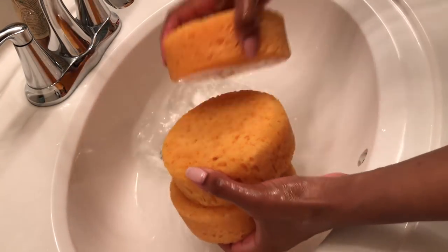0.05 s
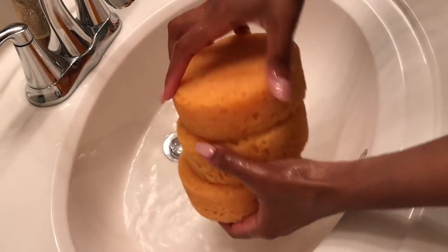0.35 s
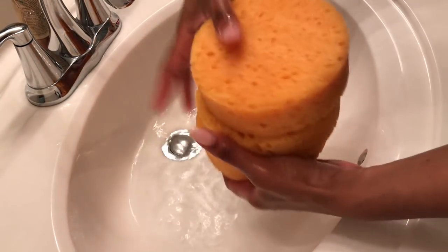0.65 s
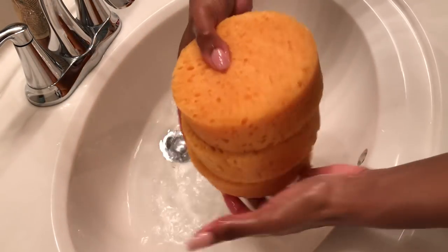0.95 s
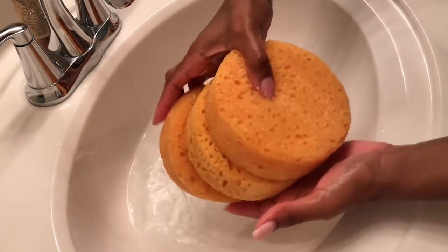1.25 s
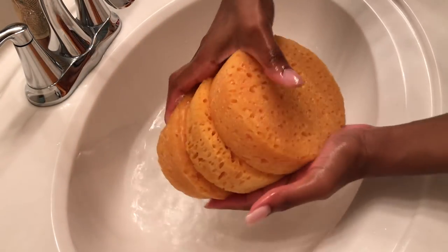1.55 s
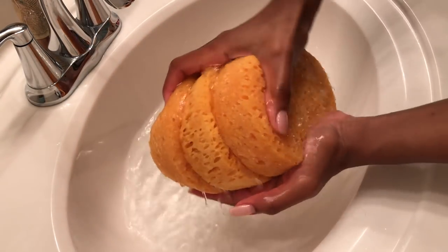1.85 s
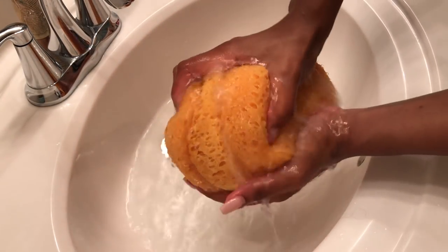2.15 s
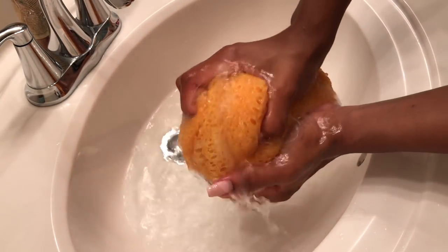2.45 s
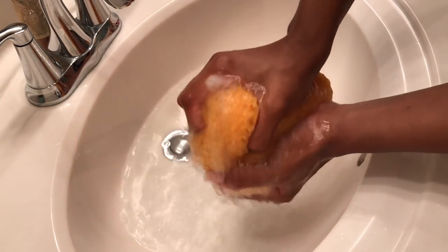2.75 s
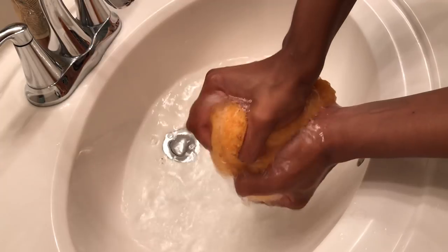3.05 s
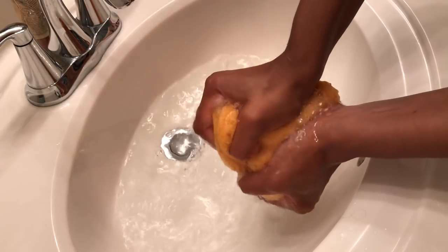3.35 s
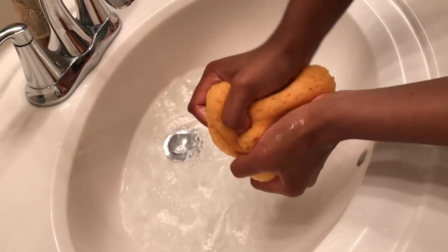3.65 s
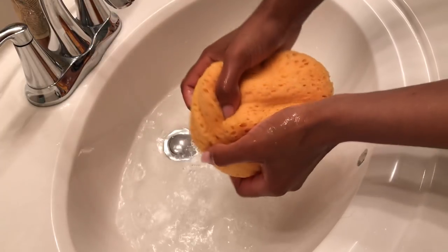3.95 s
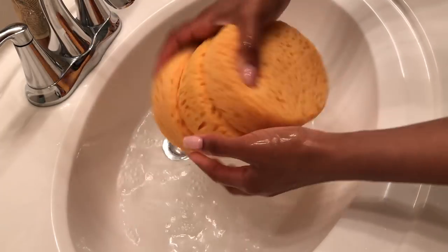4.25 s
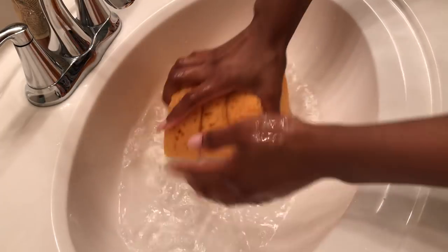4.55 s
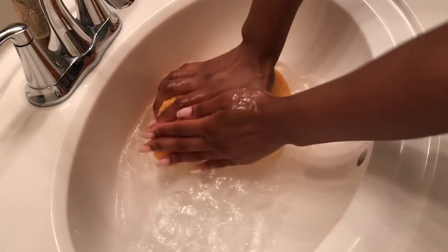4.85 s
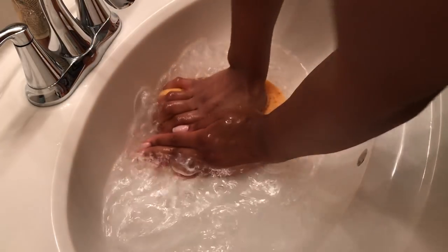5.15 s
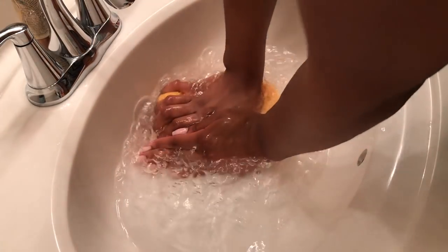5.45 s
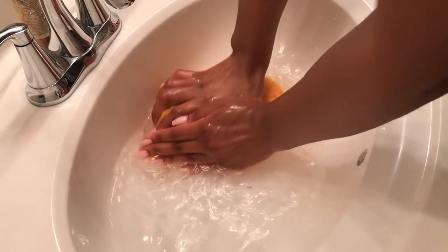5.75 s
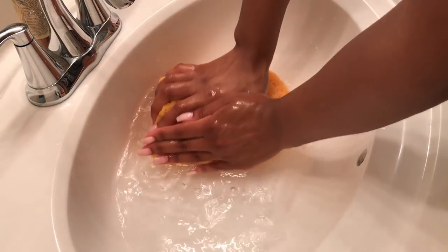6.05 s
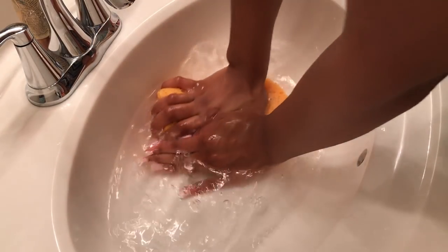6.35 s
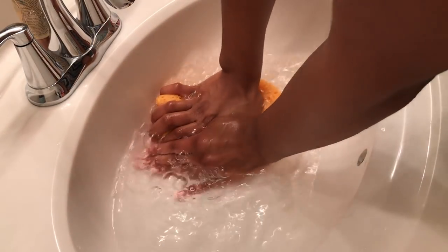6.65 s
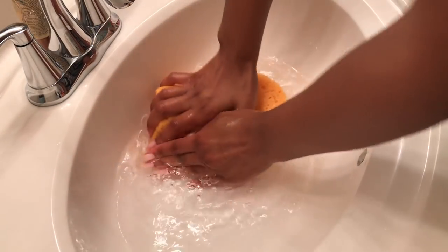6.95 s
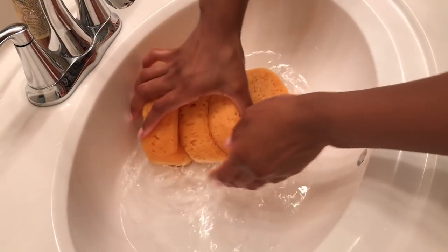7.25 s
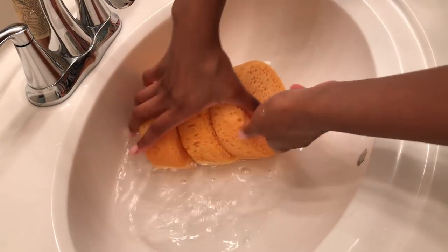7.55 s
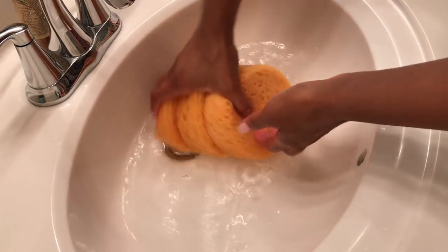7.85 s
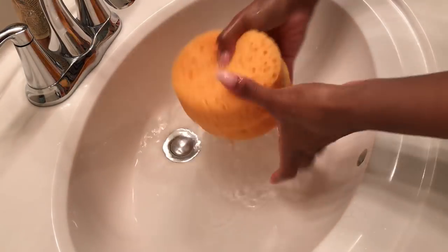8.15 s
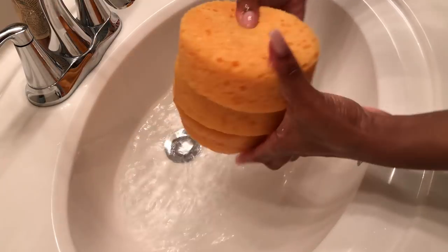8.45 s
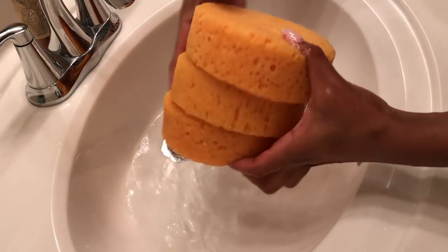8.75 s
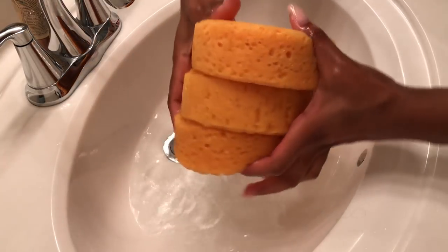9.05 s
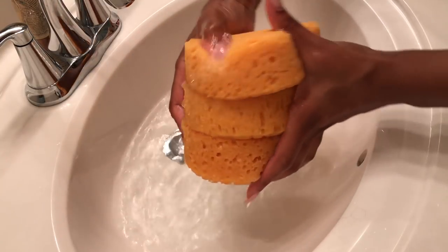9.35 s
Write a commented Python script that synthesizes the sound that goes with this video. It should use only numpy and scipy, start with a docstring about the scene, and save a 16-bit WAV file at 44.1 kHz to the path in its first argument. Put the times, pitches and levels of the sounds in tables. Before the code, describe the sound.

Soaked sponges fizz and drip, gush into a basin as they are squeezed, then churn and gurgle when pressed under shallow water.

```python
"""Soaked sponges are wrung out over a ceramic sink in a small, humming bathroom.
First the gripped foam fizzes, drips plink as they trap air bubbles, and a wet sponge lands with a thud.
From about 2 s the wringing lets go a spattering pour; after 3.4 s it thins and the foam sucks in air.
From 5.2 s the sponges are pressed twice under shallow water, which glugs, churns, froths and squirts.
Last come more fizz and scattered drips. Bowl and walls echo every sound of the water."""
import sys
import numpy as np
from scipy import signal
from scipy.fft import rfft, irfft
from scipy.io import wavfile
from scipy.ndimage import uniform_filter1d

SR = 44100
rng = np.random.default_rng(int(sys.argv[2]) if len(sys.argv) > 2 else 0)


def to_wav(sig):
    """Store sig (one row per channel, or 1-D mono) as 16-bit WAV at the path in sys.argv[1].

    Samples outside -1..1 are clipped; the rate is SR.
    """
    pcm = np.clip(np.atleast_2d(sig), -1, 1) * 32767
    pcm = np.round(pcm).astype(np.int16)
    wavfile.write(sys.argv[1], SR, pcm.T)  # frames by channels


N = 414532
TIME = np.arange(N) / SR


def amp(db):
    """Amplitude ratio of a level in decibels."""
    return 10 ** (np.asarray(db) / 20)


def unit_rms(x):
    """Normalisation to a mean power of 1."""
    return x / np.sqrt(np.mean(x ** 2) + 1e-20)


def read(points, hz):
    """Interpolation of (frequency_hz, value) points on a log-frequency axis."""
    f, value = np.transpose(points)
    return np.interp(np.log(hz + 1), np.log(f + 1), value)


def add(mix, start_s, sound):
    """Superposition: a sound joins the mix at start_s."""
    part = mix[max(0, round(start_s * SR)):][:len(sound)]
    part += sound[:len(part)]


def coloured(x, spectrum, size=4096):
    """Minimum-phase filtering: being causal, it leaves clicks their sharp front."""
    gain_db = np.maximum(read(spectrum, abs(np.fft.fftfreq(size, 1 / SR))), -100)
    log_response = np.conj(signal.hilbert(np.log(amp(gain_db))))
    taps = np.fft.ifft(np.exp(log_response)).real
    return signal.oaconvolve(x, taps[:size // 2])[:len(x)]


def band_noise(count, hz, width_hz):
    """Random excitation of one resonance, at rms 1."""
    f = np.fft.rfftfreq(count, 1 / SR)
    resonance = f / (f + 100) / (1 + (2 * (f - hz) / width_hz) ** 2)
    return unit_rms(irfft(rfft(rng.standard_normal(count)) * resonance, count))


def steadied(x, size=5000):
    """Division by the running rms: the level holds steady and the grain remains."""
    power = uniform_filter1d(uniform_filter1d(x ** 2, size), size // 2)
    return x / np.sqrt(abs(power) + 1e-20)


def texture(x, spectrum):
    """Source and filter: a grainy excitation takes on a spectrum, near rms 1."""
    return steadied(coloured(x, spectrum))


def clicks(per_s, spread_db):
    """A Poisson process of impacts: many small, a few large."""
    size_db = spread_db * np.minimum(rng.exponential(1, N), 5)
    return (rng.random(N) < per_s / SR) * amp(size_db) * rng.choice([-1, 1], N)


def bubble(hz, decay_s, rise_per_s=0, onset_cycles=0.73):
    """Minnaert resonance: trapped air rings as a damped spring, rising in pitch near the surface."""
    t = np.arange(0, 6 * decay_s, 1 / SR)
    turns = hz * (t + rise_per_s * t ** 2 / 2)
    onset = 1 - np.exp(-t * hz / onset_cycles)
    return np.sin(2 * np.pi * turns) * np.exp(-t / decay_s) * onset


def swarm(start_s, end_s, per_s, low_hz, high_hz, cycles, spread_db, climb=0.07, octaves_per_s=0):
    """A cloud of independent bubble resonators, random in time, size, strength and damping."""
    out = np.zeros(N)
    for when, size, strength, damping in rng.random((int(per_s * (end_s - start_s)), 4)):
        age_s = when * (end_s - start_s)
        hz = low_hz * (high_hz / low_hz) ** size * 2 ** (octaves_per_s * age_s)
        decay_s = cycles * (.5 + damping) / hz
        level_db = -spread_db * np.log(max(strength, .02))
        # small bubbles ring briefly, so they need a higher peak for the same strength
        add(out, start_s + age_s, amp(level_db) * hz / high_hz * bubble(hz, decay_s, climb / decay_s))
    return out + 1e-4 * rng.standard_normal(N)


def wobble(count, depth_db, hz=170):
    """Amplitude modulation of a bubble jostled by the water around it."""
    return amp(depth_db * band_noise(8192, hz, 2 * hz)[:count])


def stroke(start_s, end_s, rise_db_per_s, fall_db_per_s):
    """Envelope of a hand movement: exponential growth to 1 at start_s, exponential decay from end_s."""
    before_s = np.maximum(start_s - TIME, 0)
    after_s = np.maximum(TIME - end_s, 0)
    return amp(-rise_db_per_s * before_s - fall_db_per_s * after_s)


def power_sum(gains):
    """Incoherent addition: the powers of overlapping sources add."""
    return np.sqrt(sum(gain ** 2 for gain in gains))


# ventilation rumble: frequency_hz, gain_db
RUMBLE_SPECTRUM = [(15, -54), (25, -45), (42, -6), (59, -22), (134, 6.5), (185, -9), (240, -3.5),
                   (282, -7.5), (421, -9), (475, -19.5), (580, -10.5), (642, -15.5), (1270, -19),
                   (1400, -22), (3000, -20), (3900, -23), (6600, -120)]
# partials of the hum: pitch_hz, level_db
HUM_PARTIALS = [(60, -70.5), (71.5, -63), (143.5, -68.5), (213, -73), (240.5, -65.5), (433, -79)]


def room_tone(rumble_db=-58.5, waver=0.29):
    """Ventilation noise under a hum whose partials waver by beating with narrow-band noise."""
    rumble = amp(rumble_db) * unit_rms(coloured(rng.standard_normal(N), RUMBLE_SPECTRUM))
    hum = sum(amp(db) * unit_rms(np.sin(2 * np.pi * hz * TIME) + waver * band_noise(N, hz, 4.4))
              for hz, db in HUM_PARTIALS)
    return rumble + hum


# bursting films: frequency_hz, gain_db
FIZZ_SPECTRUM = [(500, -5), (1500, -22), (3500, 1.5), (6200, 4.5), (9000, 3), (13000, 4.5), (17500, 1.5)]
# grips that shift or release the foam: start_s, end_s, fizz_db, dribble_db
HAND_GRIPS = [(0, 0.866, -62, -60), (1.182, 1.338, -61, -52), (1.658, 1.8, -60.5, -60),
              (1.935, 3.3, -54.5, -48), (4.54, 4.792, -62, -84), (5.63, 5.725, -64, -60),
              (6.9, 7.605, -65, -77), (8.458, 8.997, -60.5, -65), (9.403, 9.402, -52, -47.5)]
GRIP_RISE_DB_PER_S = 94


def foam(resting_db=-63.5, hardest_push_db=-55.5, follow=0.54):
    """Film rupture: tiny bursts merge into a hiss, larger ones pop; grips and pushes raise the level."""
    hiss = texture(clicks(per_s=11000, spread_db=3), FIZZ_SPECTRUM)
    films = swarm(0, N / SR, per_s=260, low_hz=5500, high_hz=16900, cycles=3, spread_db=3.8)
    pops = unit_rms(coloured(films, FIZZ_SPECTRUM))
    gains = [amp(resting_db)]
    for start_s, end_s, fizz_db, _ in HAND_GRIPS:
        gains.append(amp(fizz_db) * stroke(start_s, end_s, GRIP_RISE_DB_PER_S, fall_db_per_s=33))
    loudest_churn_db = max(churn_db for _, _, churn_db, _, _ in HAND_PUSHES)
    for start_s, end_s, churn_db, _, _ in HAND_PUSHES:
        fizz_db = hardest_push_db + follow * (churn_db - loudest_churn_db)
        gains.append(amp(fizz_db) * stroke(start_s, end_s, *SPRAY_SLOPES_DB_PER_S))
    return power_sum(gains) * (hiss + amp(-4) * pops)


# water falling into the basin: frequency_hz, gain_db
FALLING_WATER_SPECTRUM = [(300, -42.5), (600, -8), (950, -4), (1600, -4.5), (1950, -7), (3000, -2.5),
                          (4100, -4), (6000, -11), (8000, -12.5), (12000, -14.5), (15000, -14),
                          (17500, -22)]


def dribble(trim_db=-2):
    """Air entrainment: each grip frees thin trickles that leave a scatter of small ringing bubbles."""
    bubbles = swarm(0, N / SR, per_s=260, low_hz=1093, high_hz=8340, cycles=5.6, spread_db=2.5,
                    climb=0.069)
    level = power_sum(amp(db) * stroke(start_s, end_s, GRIP_RISE_DB_PER_S, fall_db_per_s=50)
                      for start_s, end_s, _, db in HAND_GRIPS)
    return amp(trim_db) * level * texture(bubbles, FALLING_WATER_SPECTRUM)


# drip plinks, and glugs from the pressed sponges:
# start_s, pitch_hz, level_db, decay_ms, relative_rise_per_s, click_db
RINGING_BUBBLES = [(.015, 1595, -22.5, 4.5, -11, -42.5), (0.014, 2720, -34, 1.7, 0, -52),
                   (.089, 1080, -37, 6.8, 1, -62), (.135, 5900, -31, 1.6, 0, -43),
                   (0.177, 6150, -27, 1.7, 8, -53), (.186, 1387, -24, 7.2, 8.5, -36),
                   (.235, 1310, -26.5, 5.7, 32, -51), (.289, 1308, -22, 4.5, -1, -34.5),
                   (0.334, 2250, -37.5, 6.7, 6, -39), (.448, 4700, -29, 2.2, 11, -23.5),
                   (.48, 1915, -36.5, 5.1, 4, -44), (0.639, 3200, -33.5, 1.9, 29, -36),
                   (.733, 1800, -22, 2.7, -12, -30.5), (.788, 4320, -27, 2.1, 2, -38),
                   (.802, 2310, -35.5, 3, 0, -38), (.829, 4960, -34, 2.4, 0, -37.5),
                   (0.897, 4600, -28.5, 2.5, 0, -33), (1.192, 857, -21, 9.2, 0, -36),
                   (1.202, 1694, -27.5, 8.1, -1.5, -35), (1.222, 1220, -23, 4.1, 5, -28.5),
                   (1.252, 5800, -28.5, 1.4, 30, -47), (1.297, 1734, -27, 8, 0, -30.5),
                   (1.391, 2190, -39.5, 5, 5, -53), (1.436, 1690, -30, 4.9, -4.5, -39.5),
                   (1.650, 2390, -37.5, 4.4, 3, -46), (1.661, 2360, -31.5, 2.3, 8, -37),
                   (1.792, 4100, -28.5, 1.6, -9, -39.5), (1.899, 1910, -37, 4.4, 28, -29.5),
                   (2.059, 5080, -23.5, 1.2, 14, -33), (2.086, 1920, -34, 3, -2, -46),
                   (2.113, 1264, -23.5, 4.9, -4.5, -35), (2.155, 1707, -24.5, 3.5, -0.5, -35),
                   (2.267, 904, -22, 7.2, 14, -30), (2.344, 1005, -28, 6.6, 3, -37),
                   (2.377, 1025, -25.5, 5.7, 3, -36), (2.414, 880, -24.5, 8.3, 9.5, -30),
                   (2.455, 678, -31.5, 8, 9, -41), (2.491, 1020, -27.5, 7.3, 2, -38),
                   (2.596, 4090, -16, 1.6, 4, -41), (2.597, 1134, -26, 5.5, 4, -35),
                   (2.626, 950, -25.5, 8.3, 5, -41), (2.672, 2350, -23.5, 3.3, 4, -28),
                   (2.686, 1800, -27, 3.5, -3, -28), (2.809, 1690, -23.5, 4.3, 0, -30),
                   (2.810, 630, -31, 6.7, 2.5, -29), (2.924, 1280, -26, 6, 2, -33),
                   (2.948, 1125, -28, 6.3, 6, -30), (3.051, 3020, -21.5, 1.8, 0, -24),
                   (3.077, 3900, -15, 1.4, 10, -21), (3.085, 614, -28, 4.7, 3, -32),
                   (3.111, 6100, -16, 1.2, 2, -31), (3.135, 1730, -30, 4, 2, -36),
                   (3.171, 1600, -32, 4.9, 0, -40), (3.228, 3470, -24, 2, 5, -38),
                   (3.256, 1630, -23, 5.8, 5, -40), (3.381, 1270, -30, 5, -1, -40),
                   (3.395, 1650, -23.5, 4, 31, -36), (3.450, 1600, -25, 6, -1.5, -31),
                   (3.531, 1525, -28, 7, 6, -38), (3.565, 1460, -31, 4.5, 5, -34),
                   (3.625, 2950, -28.5, 2.2, -4, -34), (3.698, 2960, -31, 2.4, 0, -39),
                   (3.736, 1333, -31, 6.8, 5.5, -38), (3.759, 2580, -30.5, 3.2, -14, -43),
                   (3.785, 4450, -33, 2, 0, -44), (3.792, 2985, -31, 2.4, 2, -40),
                   (3.955, 1524, -33.5, 4.8, 12, -50), (3.954, 3480, -27.5, 1.8, 9, -50),
                   (4.006, 1650, -42, 5, 3, -55), (4.064, 4400, -40, 3, -3, -55),
                   (4.672, 3400, -30.5, 2.2, 22, -49), (5.125, 1050, -43, 9.7, -2, -53),
                   (5.25, 1355, -24.5, 3.4, 49, -55), (5.254, 600, -27, 6.4, 6, -45),
                   (5.275, 560, -26.5, 11, 0, -41), (5.314, 620, -30.5, 7.7, 6, -46),
                   (5.345, 658, -26.5, 5.2, 4, -52), (5.479, 1390, -30, 2.6, 37, -47),
                   (5.700, 2800, -42, 2.2, -2, -55), (5.727, 2150, -33.5, 3, 40, -45),
                   (6.558, 3200, -33, 2.5, 5, -42), (6.638, 890, -28.5, 3.6, 8, -56),
                   (6.815, 8830, -30.5, 1.5, -1, -52), (7.305, 3440, -37, 2.1, 4, -57),
                   (8.079, 3430, -33.5, 1.1, 12, -46), (8.196, 1038, -48, 10, 1, -63),
                   (8.27, 3400, -32.5, 2.8, 25, -47), (8.272, 1900, -33, 1.6, 7, -45),
                   (8.317, 1525, -40, 8.8, -0.5, -42), (8.401, 1675, -31, 4.1, 34.5, -42),
                   (8.526, 2230, -41.5, 3.5, 5, -39.5), (8.797, 1990, -29, 6, 54, -37),
                   (8.811, 2400, -44, 3.5, -8, -51), (8.833, 3900, -30, 2.2, 73, -41),
                   (8.95, 2960, -23, 3.4, -13.5, -35), (8.969, 2280, -34, 3, -16, -36),
                   (9.094, 2390, -39, 8.9, -18.5, -47), (9.149, 2510, -26.5, 5, 52.5, -36.5),
                   (9.324, 2370, -30.5, 6.6, 3, -30.5), (9.366, 1520, -36, 7, 22, -35.5)]


def plinks_and_glugs(click_s=0.002, front_s=0.00013, splash_s=0.0071):
    """Bubble resonance: each plink or glug opens with a click and rings inside a brief splash."""
    out, t = np.zeros(N), np.arange(2048) / SR
    click = np.exp(-t / click_s) * (1 - np.exp(-t / front_s))
    splash = t / splash_s * np.exp(1 - 2 * t / splash_s)
    for start_s, hz, db, decay_ms, rise_per_s, click_db in RINGING_BUBBLES:
        ring = bubble(hz, decay_ms / 1000, rise_per_s)
        add(out, start_s, amp(db - 1) * ring * wobble(len(ring), depth_db=2))
        add(out, start_s, amp(db - 16) * splash * band_noise(len(t), 1.36 * hz, 0.71 * hz))
        add(out, start_s, amp(click_db - 2) * click * band_noise(len(t), 8000, 11300))
    return out


def splatter(count=4, relative_db=-23.5, scatter_s=.03, low_hz=5000, high_hz=15500):
    """Secondary droplets: a few follow each plink or glug, ticking as they fall back."""
    out = np.zeros(N)
    for start_s, _, db, *_ in RINGING_BUBBLES:
        for delay, size, strength in rng.random((count, 3)):
            ring = bubble(low_hz * (high_hz / low_hz) ** size, TICK_DECAY_S)
            add(out, start_s + scatter_s * delay, amp(db + relative_db) * 2 * strength * ring)
    return out


# droplets so small that their bubble only ticks: start_s, level_db, pitch_hz
TINY_DROPLETS = [(.037, -38, 6300), (.138, -35, 7900), (.165, -42, 7000), (0.188, -29, 6840),
                 (0.245, -34, 6280), (.286, -36, 4860), (.334, -37, 7050), (.496, -33, 11200),
                 (.511, -38, 7100), (.631, -25.5, 12100), (.632, -31, 6010), (.694, -36, 6100),
                 (0.788, -34, 8300), (0.963, -33.5, 8400), (1.033, -30, 8000), (1.052, -29.5, 7850),
                 (1.074, -30, 13000), (1.109, -32.5, 5870), (1.152, -39, 6100), (1.192, -26, 5800),
                 (1.267, -35, 7300), (1.287, -26, 5700), (1.325, -29, 5700), (1.338, -30, 7000),
                 (1.355, -26, 11100), (1.361, -33, 7140), (1.416, -23, 15900), (1.596, -35, 13500),
                 (1.643, -30, 6150), (2.485, -23, 4300), (2.590, -23, 6050), (2.911, -23, 4360),
                 (2.952, -21, 12750), (3.134, -20, 3790), (3.169, -23, 2870), (3.346, -21, 3420),
                 (3.448, -23, 4280), (3.492, -19, 8500), (3.691, -29, 6400), (3.707, -28, 6960),
                 (3.737, -30, 3900), (3.916, -31.5, 4400), (4.331, -36, 14800), (4.689, -31, 2700),
                 (5.262, -34, 6900), (5.312, -31.5, 7200), (5.44, -38, 6640), (5.585, -33, 12800),
                 (5.913, -33, 4940), (6.512, -28, 9500), (6.527, -31, 5570), (6.544, -31, 12900),
                 (6.593, -33.5, 5250), (6.913, -33.5, 11900), (8.116, -35, 13100), (8.561, -31, 7200),
                 (8.75, -34, 7500), (8.763, -29.5, 10100), (8.928, -26, 6100), (8.929, -32, 10000),
                 (8.966, -37, 8810), (8.982, -35, 12500), (9.115, -36, 9300), (9.138, -30, 13500),
                 (9.291, -38, 8700), (9.354, -31, 5450)]
TICK_DECAY_S = 0.0007


def ticks(snap_s=0.0013):
    """Rapid damping: a tiny bubble snaps shut and rings for only a few cycles."""
    out, t = np.zeros(N), np.arange(1024) / SR
    for start_s, db, hz in TINY_DROPLETS:
        add(out, start_s, amp(db - 2) * bubble(hz, TICK_DECAY_S))
        add(out, start_s, amp(db - 7) * band_noise(len(t), 1.1 * hz, hz) * np.exp(-t / snap_s))
    return out


# low thud of a wet sponge landing, then low gulps of air: start_s, final_pitch_hz, level_db, decay_ms
THUD_AND_GULPS = [(0.4056, 153, -6, 3.6), (.446, 137, -32, 20), (5.246, 157, -27, 12),
                  (5.312, 160, -26, 7.1), (5.759, 167, -27.5, 8.2), (5.848, 164.8, -28.5, 4.5),
                  (6.34, 130, -29.5, 23.8), (6.93, 141, -39, 14), (7.186, 148, -26.5, 2.9),
                  (7.231, 141, -34, 7.7)]


def thud_and_gulps(start_ratio=1.66, settle_s=0.0024, attack_s=0.0021):
    """Damped oscillation: a wet sponge thuds down, then air gulps; each low tone sinks in pitch."""
    out, t = np.zeros(N), np.arange(8192) / SR
    sag = 1 + (start_ratio - 1) * np.exp(-t / settle_s)
    attack = 1 - np.exp(-(t / attack_s) ** 2)
    for start_s, hz, db, decay_ms in THUD_AND_GULPS:
        turns = np.cumsum(hz * sag) / SR
        add(out, start_s, amp(db) * np.sin(2 * np.pi * turns) * np.exp(-1000 * t / decay_ms) * attack)
    return signal.sosfilt(signal.butter(2, 85, "highpass", fs=SR, output="sos"), out)


# bubbles that shrink as they surface: start_s, length_s, first_pitch_hz, first_level_db
SURFACING_BUBBLES = [(0.532, 0.062, 538, -43), (6.665, 0.0312, 926, -50)]


def bloops(mean_climb_hz_per_s=27000, bend=2.7, growth_db=12.5, burst_share=0.17):
    """Resonance rises as size falls: a surfacing bubble glides up ever faster, swells and bursts."""
    out = np.zeros(N)
    for start_s, length_s, first_hz, db in SURFACING_BUBBLES:
        age = np.linspace(0, 1, int(length_s * SR))
        hz = first_hz + mean_climb_hz_per_s * length_s * age ** bend
        tone = np.sin(2 * np.pi * np.cumsum(hz) / SR)
        gain = amp(db + growth_db * age) * np.minimum((1 - age) / burst_share, 1)
        add(out, start_s, gain * wobble(len(age), depth_db=2.5) * tone)
    return out


# water bursting from under the hands: start_s, level_db, decay_ms, centre_hz, width_hz
HAND_SPLASHES = [(1.179, -47, 51, 2740, 1800), (1.264, -39, 31, 970, 450), (2.136, -34.5, 22, 3720, 2500),
                 (2.195, -34, 13, 3340, 1500), (2.683, -33.5, 6.7, 5000, 4500),
                 (2.808, -41, 7.3, 8000, 12000), (2.99, -32.5, 28, 2900, 1500),
                 (3.31, -38.5, 110, 4400, 2520), (3.622, -42, 26, 2670, 2500), (3.725, -45, 35, 3140, 1500),
                 (4.54, -50, 29, 520, 1800), (4.576, -52, 4.7, 1400, 1500), (4.645, -51.5, 25, 2310, 600),
                 (5.124, -42.5, 6.5, 900, 900), (5.429, -46.5, 23, 1600, 1500),
                 (5.745, -31, 8.3, 2790, 1510), (5.754, -35.5, 13, 596, 1700),
                 (5.756, -28.5, 5, 9980, 14000), (5.76, -20.5, 2.6, 4000, 3150),
                 (6.46, -39.5, 52, 1510, 1302), (6.636, -42, 8.1, 2060, 1100), (6.918, -42, 6, 2750, 2200),
                 (8.793, -41, 5.9, 2860, 2200), (8.936, -42, 4.4, 3400, 1200), (8.965, -47, 17, 1920, 1200),
                 (9.311, -59, 12, 3800, 2500)]


def splashes(swell_share=0.22):
    """Turbulence radiates broad-band noise that swells quickly and decays exponentially."""
    out, t = np.zeros(N), np.arange(8192) / SR
    for start_s, db, decay_ms, hz, width_hz in HAND_SPLASHES:
        age = 1000 * t / decay_ms
        envelope = np.minimum(age / swell_share, np.exp(swell_share - age))
        add(out, start_s, amp(db) * envelope * band_noise(len(t), hz, width_hz))
    return out


# unbroken streams drumming on the pool: frequency_hz, gain_db
DRUM_SPECTRUM = [(60, -45), (100, -25), (130, 0.5), (200, -1), (320, -2), (460, -5.5), (700, -19),
                 (1500, -20)]
# dips in the pour as the fingers shift: centre_s, dip_db
FLOW_DIPS = [(2.04, -2.5), (2.31, -3.5), (2.565, -1), (2.77, -1.5), (3.2, -3), (3.295, -1), (3.53, -1.5),
             (3.59, -5), (3.675, -3.5)]


def pour(full_s=2.35, ease_s=3.43, rise_db_per_s=43.5, afterflow_share=0.53, dip_s=0.022):
    """Stream break-up: wrung-out water drums on the pool, spatters as drops and entrains bubbles."""
    span = full_s - .75, ease_s + 1
    impacts = clicks(per_s=4800, spread_db=3)
    fine = swarm(*span, per_s=460, low_hz=5080, high_hz=16600, cycles=3.3, spread_db=4)
    small = swarm(*span, per_s=1000, low_hz=1587, high_hz=7550, cycles=3.9, spread_db=5)
    # the streams thin as the sponges empty, so the large bubbles get smaller and higher
    large = swarm(*span, per_s=170, low_hz=554, high_hz=1010, cycles=5.7, spread_db=3,
                  octaves_per_s=0.529)
    spray = (amp(1) * texture(impacts, FALLING_WATER_SPECTRUM)
             + amp(-7) * texture(fine, FIZZ_SPECTRUM)
             + amp(-1) * texture(small, FALLING_WATER_SPECTRUM)
             + amp(-6) * texture(large, FALLING_WATER_SPECTRUM))
    drum = texture(clicks(per_s=400, spread_db=2), DRUM_SPECTRUM)
    dips_db = sum(db * np.exp(-((TIME - centre_s) / dip_s) ** 2) for centre_s, db in FLOW_DIPS)
    spurts = amp(dips_db + band_noise(N, 35, 60))
    # when the grip eases, part of the flow is cut off and the rest thins slowly
    squeezed = (1 - afterflow_share) * stroke(full_s, ease_s, rise_db_per_s, fall_db_per_s=138)
    afterflow = afterflow_share * stroke(full_s, ease_s, rise_db_per_s, fall_db_per_s=35.5)
    streams = stroke(1.945, ease_s, rise_db_per_s=148, fall_db_per_s=61)
    return spurts * (amp(-40) * (squeezed + afterflow) * spray + amp(-51) * streams * drum)


# air drawn into the pores: frequency_hz, gain_db
SUCTION_SPECTRUM = [(900, -4.5), (2500, -9), (3450, -4), (4000, -6.5), (6500, -2), (9000, -2.5),
                    (13000, -2.5), (17500, -7)]


def swelling(start_s=3.55, end_s=4.083):
    """Elastic recovery: the wrung foam expands and sucks in air with a hiss and a wet crackle."""
    hiss = unit_rms(coloured(rng.standard_normal(N), SUCTION_SPECTRUM))
    films = swarm(start_s - .6, end_s + 1.5, per_s=700, low_hz=1410, high_hz=8100, cycles=3.3,
                  spread_db=5.5)
    crackle = texture(films, SUCTION_SPECTRUM)
    intake = stroke(start_s, end_s, GRIP_RISE_DB_PER_S, fall_db_per_s=39)
    return intake * (amp(-52) * hiss + amp(-59.5) * crackle)


# spray between the fingers: frequency_hz, gain_db
SPRAY_SPECTRUM = [(900, -23), (1700, -3.5), (2800, 2.5), (3800, 0), (4900, -8.5), (6200, -7), (8000, -11),
                  (11000, -21), (17000, -27)]
# churning water, for each kind of push: frequency_hz, gain_db
CHURN_SPECTRA = { "sinking": [(59, -51), (100, 0.5), (168, -2.5), (238, -11), (324, -8), (370, -12.5),
                 (588, -5), (823, -14), (1510, -16), (2200, -21), (2860, -53), (4840, -120)],
                 "shifting": [(59, -28), (100, 9), (140, 6.5), (264, -19), (420, -8), (491, -2.5),
                 (2200, -27), (2860, -58), (4840, -120)], "flattened": [(59, -33), (100, -0.5), (174, -0.5),
                 (290, -4), (355, -7.5), (404, -1), (472, -3.5), (581, -1), (937, -8), (1070, -5.5),
                 (1810, -15.5), (2200, -12.5), (2860, -12), (4840, -120)]}
# pushes on the sunken sponges: start_s, end_s, churn_db, spray_db, kind
HAND_PUSHES = [(5.2, 5.348, -38, -57.5, "sinking"), (5.75, 5.821, -46.5, -59, "shifting"),
               (6.408, 6.547, -35.5, -51.5, "flattened"), (6.912, 6.942, -50.5, -61.5, "flattened"),
               (7.165, 7.445, -58, -69, "flattened")]
SPRAY_SLOPES_DB_PER_S = 102, 94  # rise, fall


def presses(churn_trim_db=-4.5, spray_trim_db=4):
    """Displacement: water driven out below the surface churns and gurgles, while spray escapes above."""
    out = np.zeros(N)
    spray = texture(clicks(per_s=2000, spread_db=4), SPRAY_SPECTRUM)
    eddies = clicks(per_s=900, spread_db=3)
    span = HAND_PUSHES[0][0] - .5, HAND_PUSHES[-1][1] + .5
    bubbles = swarm(*span, per_s=420, low_hz=150.3, high_hz=1768, cycles=3.8, spread_db=0.9)
    for start_s, end_s, churn_db, spray_db, kind in HAND_PUSHES:
        churn = texture(eddies, CHURN_SPECTRA[kind]) + texture(bubbles, CHURN_SPECTRA[kind])
        push = stroke(start_s, end_s, rise_db_per_s=191, fall_db_per_s=117)
        out += amp(churn_db + churn_trim_db) * push * churn
        out += amp(spray_db + spray_trim_db) * stroke(start_s, end_s, *SPRAY_SLOPES_DB_PER_S) * spray
    return out


# clusters of bubbles breaking the surface: start_s, end_s, level_db
FROTH_CLUSTERS = [(5.264, 5.33, -64), (6.398, 6.435, -53), (6.503, 6.548, -61)]


def froth():
    """Buoyancy: air forced from the sunken foam surfaces as small, crisply popping bubbles."""
    span = FROTH_CLUSTERS[0][0] - .3, FROTH_CLUSTERS[-1][1] + .38
    pops = steadied(swarm(*span, per_s=700, low_hz=4470, high_hz=15000, cycles=3.7, spread_db=4.5))
    return pops * power_sum(amp(db) * stroke(start_s, end_s, rise_db_per_s=304, fall_db_per_s=225)
                            for start_s, end_s, db in FROTH_CLUSTERS)


# thin jets from under the hands: start_s, length_s, level_db, first_pitch_hz, last_pitch_hz
WHISTLING_JETS = [(6.425, .034, -35.5, 2234, 3330), (6.46, 0.0428, -36.5, 3100, 2457)]


def jets(roughness=0.47, width_hz=520):
    """Flow tone: a jet through a changing gap gives a rough whistle that swells, glides and stops."""
    out = np.zeros(N)
    for start_s, length_s, db, first_hz, last_hz in WHISTLING_JETS:
        age = np.arange(0, length_s, 1 / SR) / length_s
        turns = np.cumsum(first_hz + (last_hz - first_hz) * age) / SR
        flutter = signal.hilbert(band_noise(8192, width_hz / 2, width_hz))[:len(age)]
        whistle = unit_rms(((1 + roughness * flutter) * np.exp(2j * np.pi * turns)).real)
        add(out, start_s, amp(db) * whistle * np.sqrt(np.sin(np.pi * age)))
    return out


# reverberation time of the bathroom: frequency_hz, t60_s
REVERB_TIMES = [(130, 0.27), (800, 0.19), (2100, 0.2), (5500, 0.12), (15000, 0.12)]


def echoes(bowl_db=-8, bowl_decay_s=0.0026, room_db=-8):
    """Impulse response: early reflections off the ceramic bowl, then a diffuse tail from the walls."""
    t = np.arange(16384) / SR
    bowl = rng.standard_normal(len(t)) * np.exp(-t / bowl_decay_s) * (t > .0012)
    hz, age_s, diffuse = signal.stft(rng.standard_normal(len(t)) * (t > .006), SR, nperseg=256)
    decay = amp(-60 * age_s / read(REVERB_TIMES, hz)[:, None])
    tail = signal.istft(diffuse * decay, SR, nperseg=256)[1][:len(t)]
    return amp(bowl_db) * bowl / np.linalg.norm(bowl) + amp(room_db) * tail / np.linalg.norm(tail)


def bathroom(water, paths=6, paths_per_s=23):
    """Reflections depend on position: water lands all over the basin, so the echo paths crossfade."""
    place = paths_per_s * TIME
    out = water.copy()
    for path in range(paths):
        distance = abs((place - path) % paths - paths / 2)
        share = np.cos(np.pi / 2 * np.minimum(distance, 1))
        out += signal.oaconvolve(water * share, echoes())[:N]
    return out


def scene():
    """Superposition of the water sounds, their echoes and the tone of the room."""
    background = room_tone()
    handling = (foam() + dribble() + plinks_and_glugs() + splatter() + ticks()
                + thud_and_gulps() + bloops() + splashes())
    wringing = pour() + swelling()
    pressing = presses() + froth() + jets()
    return (background + bathroom(handling + wringing + pressing))[None]


# treble peaks and notches of the microphone: frequency_hz, gain_db
MICROPHONE_RESPONSE = [(4200, 1), (4900, 0), (5500, 2), (6600, 0.5), (7600, -2), (8400, 0), (9600, 1),
                       (10400, -5), (11200, -1), (12800, -0.5)]


def record(dry, cutoff_hz=17900):
    """Frequency response: the microphone ripples the treble, and a low-pass filter limits the band."""
    heard = coloured(dry[0], MICROPHONE_RESPONSE)
    low_pass = signal.firwin(511, cutoff_hz, window=("kaiser", 9), fs=SR)
    return signal.oaconvolve(heard, low_pass, "same")[None]


dry = scene()
out = record(dry)
to_wav(out)
```